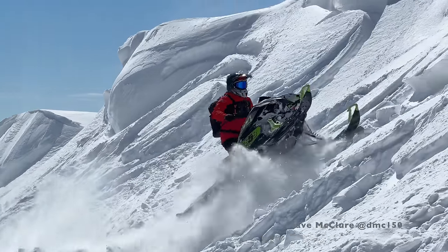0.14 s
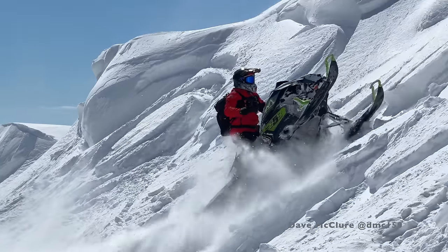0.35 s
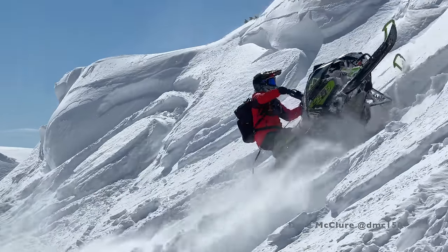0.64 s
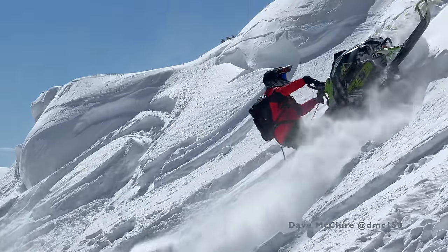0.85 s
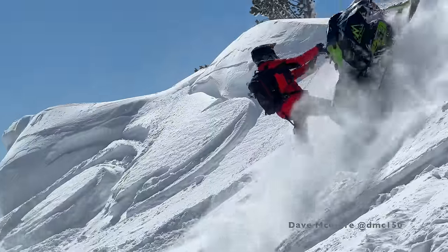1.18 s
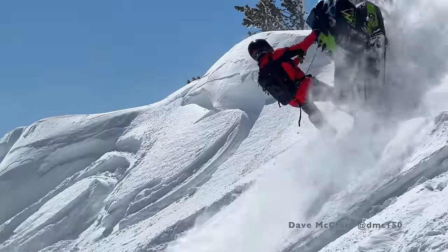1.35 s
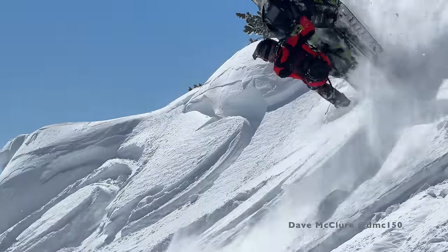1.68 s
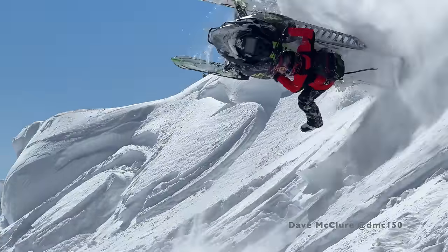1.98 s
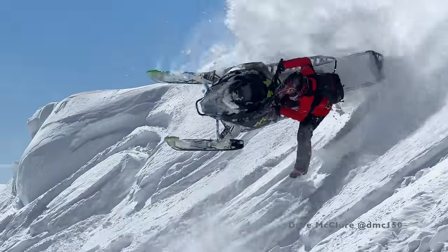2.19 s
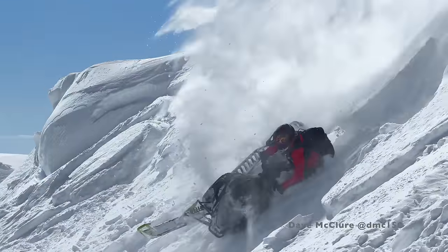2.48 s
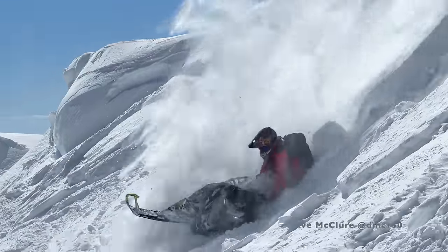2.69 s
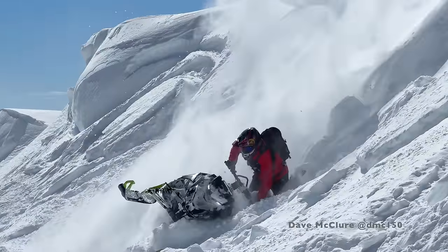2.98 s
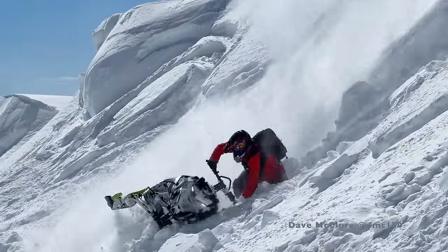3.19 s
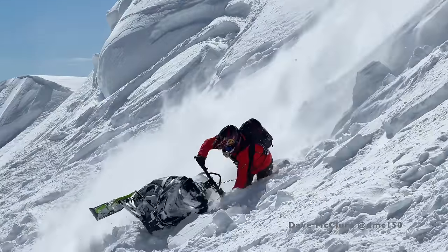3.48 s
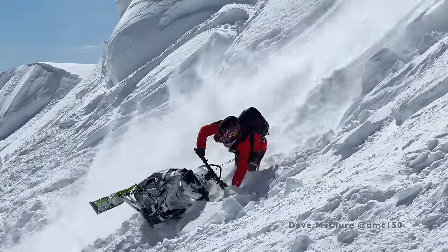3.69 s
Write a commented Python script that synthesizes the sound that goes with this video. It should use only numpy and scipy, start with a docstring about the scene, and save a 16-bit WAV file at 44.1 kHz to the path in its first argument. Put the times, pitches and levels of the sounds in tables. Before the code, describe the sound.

A two-stroke snowmobile buzzes and growls at full throttle over hiss and rumbling snow, with a thud near 0.3 seconds. At 1.5 seconds the engine falls lower and quieter as several thuds land. It revs back up from 2.3 seconds, drops again just before 3, and climbs from 3.4 to the end. Snow keeps thumping, and faint bright ticks come at about 2.1 and 3.7 seconds.

```python
"""On an open snow slope, a twin two-stroke snowmobile: full throttle, shut, open, shut and open again.
Firing pulses ring through the exhaust as a buzzing note, with a growl from the uneven cylinders.
Roar and hiss puff lightly at every firing; low thumps come and go as snow is thrown about, with
a few stronger thuds and two bright ticks. A pair of microphone ports hears it all."""
import sys
import numpy as np
from scipy import signal
from scipy.fft import rfft, irfft, next_fast_len
from scipy.io import wavfile
from scipy.ndimage import uniform_filter1d

SR = 44100
rng = np.random.default_rng(int(sys.argv[2]) if len(sys.argv) > 2 else 0)


def digitize_waveform(pressure):
    """Quantize a signal to 16-bit integers and store it at the path in sys.argv[1].

    Rows of a 2-D input are taken as channels; values are limited to [-1, 1].
    """
    field = np.atleast_2d(pressure).T
    bounded = np.clip(field, -1, 1)
    quanta = np.round(bounded * 32767).astype(np.int16)
    wavfile.write(sys.argv[1], SR, quanta)


N = 169785


def amp(db):
    """Gain of a level in dB."""
    return 10 ** (np.asarray(db) / 20)


def unit_rms(x):
    """Scales to rms 1."""
    return x / np.sqrt(np.mean(x ** 2) + 1e-20)


def spectrum_at(points, hz):
    """Reads a spectrum table on a log-frequency axis."""
    f, value = np.transpose(points)
    return np.interp(np.log(hz + 1), np.log(f + 1), value)


def curves(table):
    """One automation curve per column of a time table, sample by sample."""
    times, *columns = np.transpose(table)
    return [np.interp(np.arange(N) / SR, times, c) for c in columns]


def colour(x, eq):
    """Minimum-phase filter with the given EQ curve."""
    log_gain = np.log(amp(spectrum_at(eq, abs(np.fft.fftfreq(8192, 1 / SR)))))
    taps = np.fft.ifft(np.exp(np.conj(signal.hilbert(log_gain)))).real[:3000]
    return signal.oaconvolve(x, taps)[:N]


def below(x, hz):
    """Steep low-pass without delay."""
    return signal.sosfiltfilt(signal.butter(7, hz, fs=SR, output="sos"), x)


def drift(grid, bins):
    """Smooths a random frequency-by-time grid into slowly drifting patches."""
    return unit_rms(uniform_filter1d(uniform_filter1d(grid, size=bins, axis=0), size=24, axis=1))


def patchy_noise(eq, patchy_db=2):
    """Coloured noise in which patches of the spectrum swell and fade."""
    hz = np.fft.rfftfreq(512, 1 / SR)
    real, imag, patches = rng.standard_normal((N // 128 + 5, 257, 3)).T
    gain = amp(spectrum_at(eq, hz)[:, None] + patchy_db * drift(patches, bins=6))
    return unit_rms(signal.istft((real + 1j * imag) * gain, nperseg=512, noverlap=384)[1][:N])


def firing_pulses(cycles, jitter_cycles=.0006, shimmer_db=.8):
    """One sharp pulse per firing: the plain train, and one whose sign flips from cylinder to cylinder."""
    at = np.flatnonzero(np.diff(np.floor(cycles)) > 0)[2:-2]
    slip, strength = rng.standard_normal((1200, 2))[:len(at)].T
    step = cycles[at + 1] - cycles[at]
    centre = at + (np.floor(cycles[at + 1]) - cycles[at] + jitter_cycles * slip) / step
    near = np.round(centre).astype(int)[:, None] + np.arange(-16, 17)
    height = amp(shimmer_db * strength) / np.sqrt(step)  # same power at any engine speed
    pulses = height[:, None] * np.sinc(near - centre[:, None]) * np.hanning(33)
    train, alternating = np.zeros(N), np.zeros(N)
    np.add.at(train, near, pulses)
    np.add.at(alternating, near, pulses * (-1.) ** np.arange(len(at))[:, None])
    return train, alternating


def pipe_note(pulse_spectrum, hz):
    """The pipe colours the pulses into a buzz whose bands rise and fall with each rev."""
    # exhaust resonances: (frequency [Hz], gain [dB])
    pipe_eq = [(100, -51), (266, -3), (530, -0.5), (800, -1.5), (1066, 4), (1335, -6.5), (1600, -10),
               (1860, -22), (2130, -10.5), (2400, -17.5), (2670, -17), (3000, -31.5), (6000, -37.5),
               (9000, -39.5), (13500, -49.5), (14500, -75)]
    # crossovers between the note's bands: (frequency [Hz])
    crossovers = [380, 660, 920, 1730, 3300]
    # one table per rev: (time [s], level of the band under each crossover, lowest first [dB])
    revs = [
        [(0, -72, -46, -23, -27, -30), (.07, -44, -27.5, -26.5, -24, -30.5), (.18, -40, -25, -39, -18, -28),
         (.4, -26, -29, -26, -16, -29.5), (.7, -29, -33, -31, -14.5, -27.5),
         (.85, -31.5, -34.5, -54, -15, -35.5), (.95, -32, -35, -41, -22, -28),
         (1.2, -35, -32.5, -28, -22, -36.5), (1.39, -39, -24, -48, -21.5, -39.5),
         (1.532, -44.5, -27, -35.5, -26.5, -43.5)],
        [(1.547, -34, -31.5, -46, -57, -38), (1.65, -50.5, -36, -69, -69, -49.5),
         (1.8, -44.5, -54, -63, -78, -50.5), (2.22, -51, -54.5, -57, -69, -67),
         (2.32, -63, -40.5, -81, -39.5, -64), (2.44, -63, -38, -51, -38.5, -43),
         (2.6, -48, -38, -47, -34, -38.5), (2.78, -70, -37.5, -42, -25.5, -34.5),
         (2.926, -41, -33.5, -51, -26, -35)],
        [(2.942, -54, -41, -45, -38, -42), (3.07, -51, -53.5, -67, -49, -47), (3.34, -63, -57, -59, -63, -72),
         (3.4, -62, -67, -48, -50.5, -58), (3.6, -61, -48, -68, -42.5, -49.5),
         (3.72, -48, -50.5, -79, -41.5, -43), (3.77, -53, -38, -54, -36.5, -42.5),
         (3.85, -42, -51, -72, -49, -41)],
    ]
    levels_db = curves(np.vstack(revs))
    levels_db.append(levels_db[-1] - 16)  # the top band follows the one under it
    note = irfft(pulse_spectrum * amp(spectrum_at(pipe_eq, hz)), N)
    bands = np.diff([np.zeros(N)] + [below(note, f) for f in crossovers] + [note], axis=0)
    return sum(amp(db) * unit_rms(band) for db, band in zip(levels_db, bands))


def growl(alternating):
    """The two cylinders fire unevenly, adding half orders between the firing harmonics."""
    # colour of the half orders: (frequency [Hz], gain [dB])
    growl_eq = [(200, -38.5), (400, 0), (1200, 3.5), (1500, 7.5), (1800, -6), (2300, -8.5), (3500, -52)]
    # strength of the growl: (time [s], level [dB])
    growl_levels = [(0, -42), (.3, -32), (1.3, -32), (1.53, -36), (1.56, -69), (2.3, -57), (2.6, -49),
                    (2.92, -38.5), (2.95, -70), (3.85, -69)]
    return amp(curves(growl_levels)[0]) * unit_rms(colour(alternating, growl_eq))


def sheen(pulse_spectrum, hz):
    """Groups of firing harmonics shine out briefly and fade."""
    # harmonic swells: (middle [s], length [s], centre [Hz], width [Hz], level [dB])
    swells = [(0.072, 0.1, 1790, 118, -34), (0.67, 0.25, 1600, 120, -29.5), (0.962, 0.19, 6000, 580, -43.5),
              (.97, 0.15, 11100, 2980, -55), (1.17, 0.23, 1920, 123, -37.5), (2.436, 0.027, 915, 195, -37),
              (2.504, 0.19, 1860, 196, -36), (2.67, 0.089, 1840, 120, -32), (3.6, 0.11, 1190, 250, -53),
              (3.805, 0.1, 1025, 100, -36.5)]
    out, t = np.zeros(N), np.arange(N) / SR
    for middle, length, centre_hz, width_hz, db in swells:
        band = irfft(pulse_spectrum * np.exp(-((hz - centre_hz) / width_hz) ** 2), N)
        swell = np.exp(-((t - middle) / length * 2) ** 4)
        out += amp(db) * unit_rms(band * swell) * np.sqrt(np.mean(swell ** 2))
    return out


def exhaust(cycles, delay_s_per_hz=-1.2e-7):
    """Each firing sends a suction pulse down the pipe; the low partials leave it last."""
    train, alternating = firing_pulses(cycles)
    hz = np.fft.rfftfreq(N, 1 / SR)
    suction = -rfft(train) * np.exp(-1j * np.pi * delay_s_per_hz * hz ** 2)
    return pipe_note(suction, hz) + growl(alternating) + sheen(suction, hz)


def air_waver(x, depth_db=2.5, depth_radians=.5):
    """Moving air and snow make each harmonic drift in strength and phase on its own."""
    frames = signal.stft(x, nperseg=512, noverlap=384)[2]
    level, phase = (drift(grid, bins=3) for grid in rng.standard_normal(frames.T.shape + (2,)).T)
    wavering = frames * amp(depth_db * level) * np.exp(1j * depth_radians * phase)
    return signal.istft(wavering, nperseg=512, noverlap=384)[1][:N]


def roar_and_hiss(cycles, decay_cycles=.93, roar_depth=.053, hiss_depth=.096):
    """Low roar, midrange rasp and hiss, puffed a little at each firing."""
    # colours of the three engine noises: (frequency [Hz], gain [dB])
    roar_eq = [(100, -8.5), (450, 4.5), (900, 3), (1300, 2.5), (2000, -32)]
    rasp_eq = [(500, -51), (1000, -22), (1550, -4.5), (1800, -2), (2050, -12.5), (2700, -10.5),
               (3500, -25.5), (6000, -42)]
    hiss_eq = [(1500, 3), (3500, 5), (6000, -3.5), (8000, -3), (11000, -6.5), (13600, -15.5), (14200, -43),
               (16000, -27)]
    # noise mix, one table per rev: (time [s], roar [dB], rasp [dB], hiss [dB])
    revs = [
        [(0, -31, -36, -42), (.2, -35, -35, -39), (.55, -31, -34, -37), (1.0, -35, -36, -38),
         (1.3, -33, -36, -38.5), (1.53, -35, -40, -39)],
        [(1.6, -38, -42, -44.5), (1.8, -41.5, -49.5, -51), (2.05, -47, -57, -54), (2.24, -45, -49, -49.5),
         (2.3, -41, -42, -50), (2.46, -39, -32, -43.5), (2.55, -43, -37, -39.5), (2.75, -45, -41, -40.5),
         (2.93, -41, -39, -39)],
        [(2.98, -44, -41, -42), (3.3, -52, -49, -55.5), (3.5, -55, -49, -54.5), (3.68, -53, -46, -43),
         (3.78, -48, -40, -45.5), (3.85, -47, -43, -46)],
    ]
    roar_db, rasp_db, hiss_db = curves(np.vstack(revs))
    puff = unit_rms(np.exp(-(cycles % 1) / decay_cycles))
    roar = amp(roar_db) * patchy_noise(roar_eq) + amp(rasp_db) * patchy_noise(rasp_eq)
    roar *= 1 - roar_depth + roar_depth * puff
    hiss = patchy_noise(hiss_eq) * (1 - hiss_depth + hiss_depth * puff)
    return roar + amp(hiss_db) * unit_rms(hiss)


def thrown_snow(hits_per_s=78, spread_db=.5):
    """Snow thrown about: a loose patter of random hits, each a low thump over a deeper rumble."""
    # colours of a hit: (frequency [Hz], gain [dB])
    thump_eq = [(40, -62), (90, -24), (150, 1), (300, -6), (800, -44.5)]
    rumble_eq = [(15, -29), (40, 4.5), (80, 12.5), (130, 2), (250, -52)]
    # weight of the patter: (time [s], thump [dB], rumble [dB])
    snow_levels = [(0, -36, -34.5), (1.05, -38.5, -41), (1.87, -39.5, -47), (2.3, -49, -83),
                   (2.58, -46, -71), (3.1, -45, -83), (3.55, -55.5, -88), (3.7, -40.5, -63),
                   (3.78, -39.5, -36), (3.85, -50, -50)]
    thump_db, rumble_db = curves(snow_levels)
    onsets = rng.random(N) < hits_per_s / SR
    strength = amp(spread_db * np.minimum(rng.exponential(1, N), 4))
    hits = onsets * strength * rng.choice([-1., 1.], N)
    thumps = amp(thump_db) * unit_rms(colour(hits, thump_eq))
    return thumps + amp(rumble_db) * unit_rms(colour(hits, rumble_eq))


def thuds(attack_s=.0032, t60_s=.02):
    """Single stronger thumps, each a soft-edged sine that dies at once."""
    # thud cues: (time [s], level [dB], pitch [Hz])
    cues = [(0.261, -15.5, 243), (1.657, -22, 330), (1.743, -19, 202), (1.849, -20.5, 227),
            (2.172, -19, 292), (2.554, -20.5, 376), (2.64, -22.5, 297), (2.992, -25.5, 192),
            (3.216, -20, 290), (3.244, -25.5, 263), (3.316, -33, 950), (3.775, -22.5, 390)]
    out, t = np.zeros(N + 4000), np.arange(4000) / SR
    for start, db, hz in cues:
        envelope = amp(db - 60 * t / t60_s) * np.minimum(t / attack_s, 1)
        out[round(start * SR):][:len(t)] += 2 * envelope * np.sin(2 * np.pi * hz * t)
    return out[:N]


def ticks(attack_s=.0023, t60_s=.088):
    """Short bright ticks, each a fading burst of treble noise."""
    # tick cues: (time [s], level [dB])
    cues = [(2.118, -37.5), (3.7049, -38)]
    out, t = np.zeros(N + 4000), np.arange(4000) / SR
    for start, db in cues:
        burst = rng.standard_normal(len(t))
        envelope = amp(db - 60 * t / t60_s) * np.minimum(t / attack_s, 1)
        out[round(start * SR):][:len(t)] += envelope * (below(burst, 11700) - below(burst, 5000))
    return out[:N]


def scene():
    """Exhaust, thuds and ticks sit in the centre; engine noise and snow differ from side to side."""
    # engine speed: (time [s], firing rate [Hz])
    firing_rate = [(0, 258), (.05, 250), (.1, 255), (.18, 264.3), (.45, 267.2), (.74, 267.7), (.95, 257.2),
                   (1.1, 260.8), (1.35, 266), (1.53, 265.5), (1.63, 217), (1.9, 149.5), (2.1, 136),
                   (2.22, 138.5), (2.31, 160), (2.47, 220), (2.55, 249), (2.65, 258), (2.78, 269.5),
                   (2.925, 269), (2.97, 243), (3.2, 154), (3.33, 130.5), (3.4, 133.5), (3.57, 157),
                   (3.77, 192.3), (3.85, 213)]
    # stereo width of the noises: (frequency [Hz], side gain [dB])
    side_eq = [(60, -17.5), (300, -7), (1500, -11), (3500, -21.5), (4200, -53), (9500, -59), (10000, 0),
               (13000, -21), (13200, -44)]
    cycles = np.cumsum(curves(firing_rate)[0]) / SR
    side = colour(roar_and_hiss(cycles) + thrown_snow(), side_eq)
    mid = air_waver(exhaust(cycles)) + roar_and_hiss(cycles) + thrown_snow() + thuds() + ticks()
    return np.array([mid + side, mid - side])


def record(dry):
    """The two microphone ports shift phase against each other and lose the deepest bass and very top."""
    # phase between the ports: (frequency [Hz], left ahead of right [rad])
    phase_lead = [(100, .1), (900, .2), (1400, .5), (2300, -.3), (3900, -.06), (7700, 0), (8400, -2.9),
                  (9500, -3.4), (11500, -6.3), (14400, -9.7), (15500, -12.6)]
    low_cut_hz, high_cut_hz = 111, 15800
    size = next_fast_len(N + 4096)
    hz = np.fft.rfftfreq(size, 1 / SR)
    shift = np.exp(.5j * spectrum_at(phase_lead, hz) * np.array([[1], [-1]]))
    low_cut = 1 / (1 + (low_cut_hz / (hz + 1)) ** 4)
    ports = irfft(rfft(dry, size) * shift * low_cut, size)[:, :N]
    high_cut = signal.firwin(511, high_cut_hz, window=("kaiser", 9), fs=SR)
    return signal.oaconvolve(ports, high_cut[None], "same")


dry = scene()
out = record(dry)
digitize_waveform(out)
```